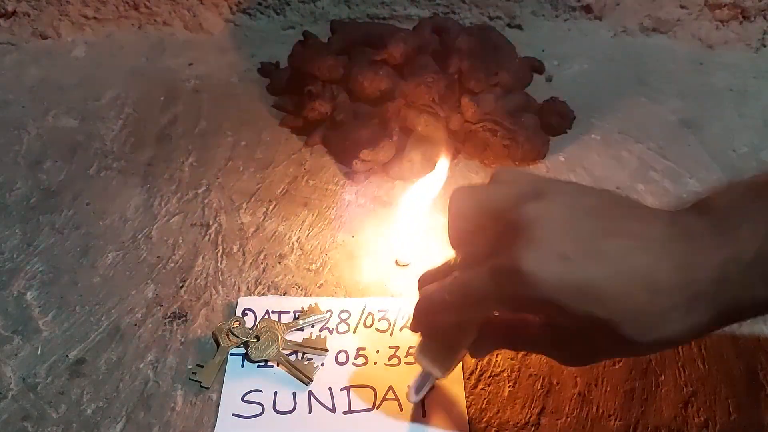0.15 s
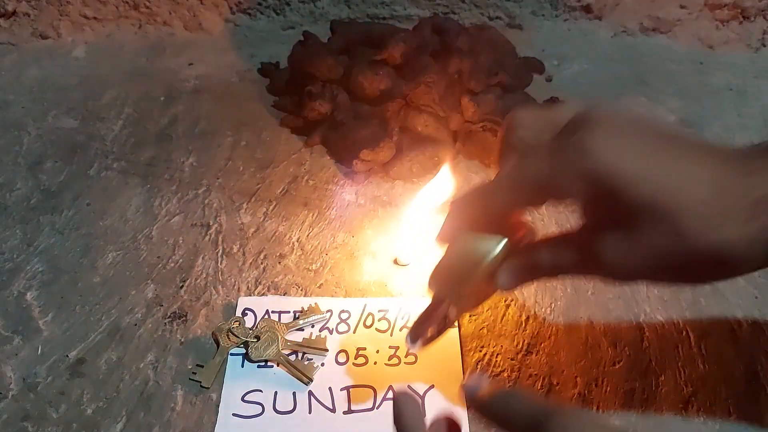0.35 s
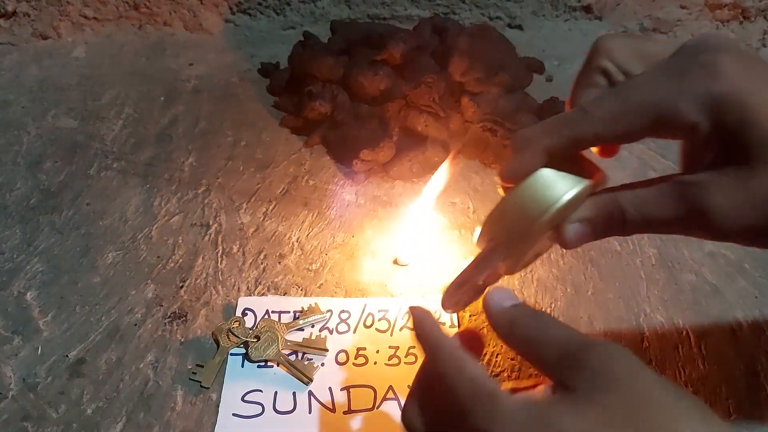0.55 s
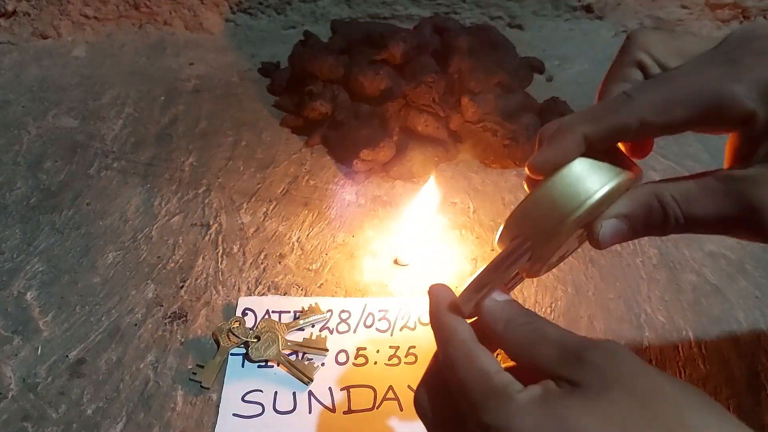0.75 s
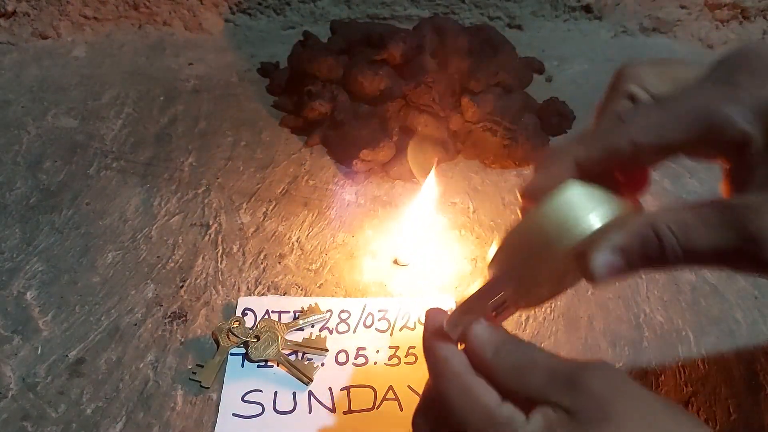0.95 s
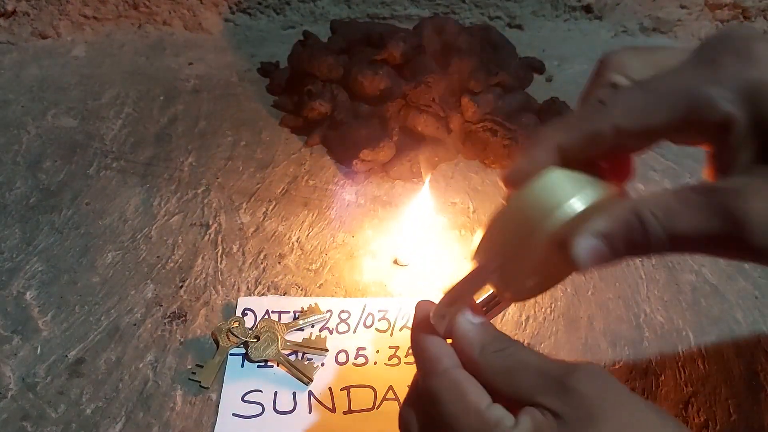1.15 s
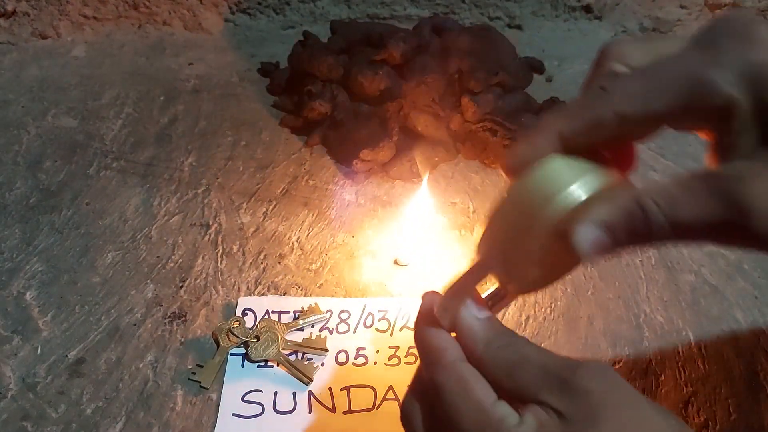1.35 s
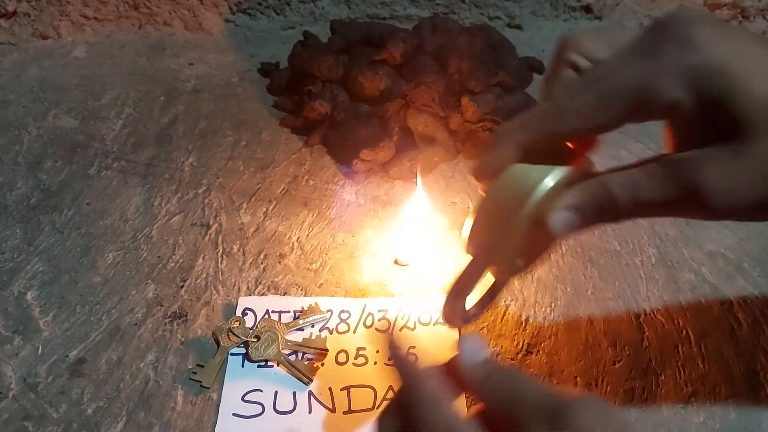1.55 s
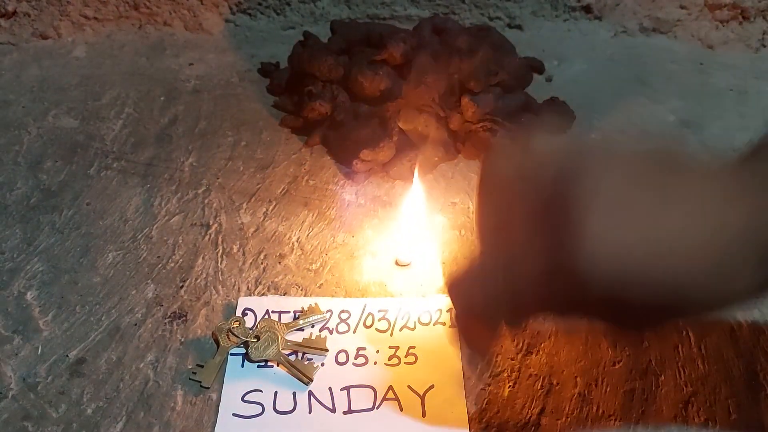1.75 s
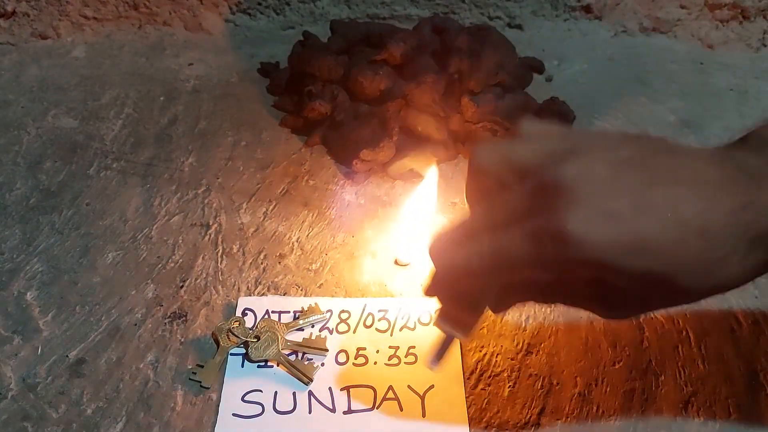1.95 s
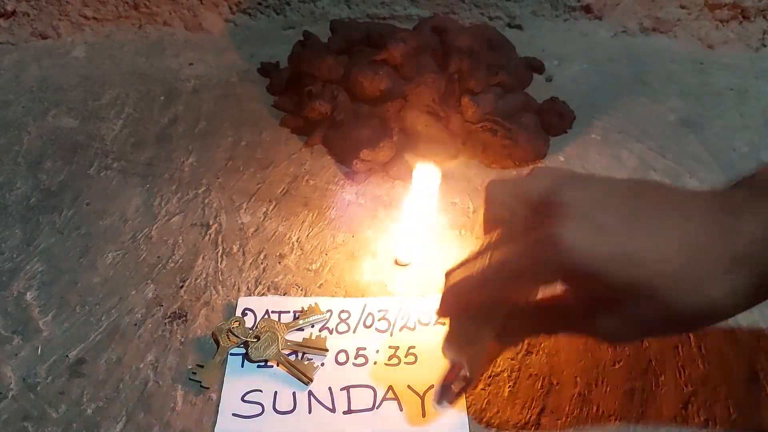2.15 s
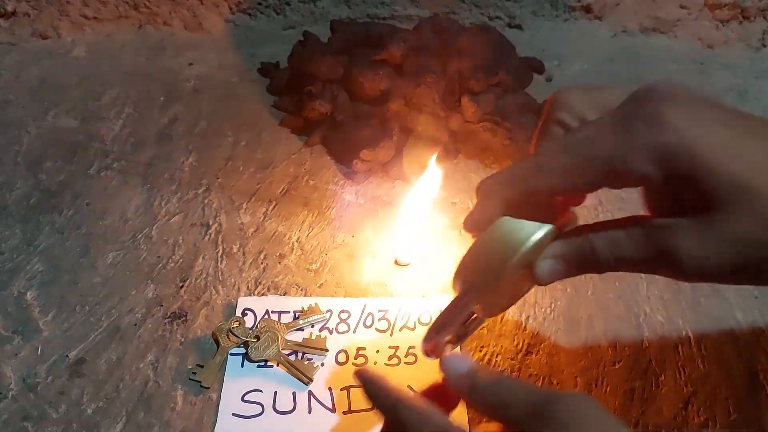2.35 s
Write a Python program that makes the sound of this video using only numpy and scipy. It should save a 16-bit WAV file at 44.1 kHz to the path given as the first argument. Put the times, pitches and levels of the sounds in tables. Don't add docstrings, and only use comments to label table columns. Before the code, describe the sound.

A hand-held metal padlock strikes a hard floor once near the start and twice near the end, with tiny key and shackle ticks between, over faint low rumble in a small hard room, close microphone.

```python
import sys
import numpy as np
from scipy import signal
from scipy.io import wavfile
from scipy.ndimage import map_coordinates

SR = 44100
rng = np.random.default_rng(int(sys.argv[2]) if len(sys.argv) > 2 else 0)


def elevation(decibels):
    levels = np.asarray(decibels, float)
    return 10 ** (levels / 20)


def unload_audio(sound):
    columns = np.transpose(np.atleast_2d(sound))
    steps = np.round(np.clip(columns, -1, 1) * 32767)
    wavfile.write(sys.argv[1], SR, steps.astype(np.int16))


N = 105840

# f/Hz, density level/dB (per Hz)
RUMBLE_SPECTRUM = [(15, -39), (25, -15), (108, 4.5), (172, -7.5), (468, -13), (818, -28), (1540, -35),
                   (1730, -48.5), (2500, -52), (3250, -71), (5500, -120)]
# t/s, level/dB
RUMBLE_SWELL = [(0.0, -55), (0.23, -60.5), (0.41, -61.5), (0.79, -63), (1.79, -58.5), (2.0, -59.5),
                (2.4, -58)]
# f/Hz, likeness/1
PORT_LIKENESS = [(22, 0), (60, .9), (180, .9), (550, 0.8), (1650, 0), (5000, 0)]
# f/Hz, density level/dB (per Hz)
HISS_SPECTRUM = [(1500, -2), (4000, -10.5), (8500, -9.5), (11000, -2), (14500, -2.06), (16500, -3.0)]
# f/Hz, t60/s
ROOM_T60 = [(100, 0.33), (300, 0.1), (1000, 0.11), (4000, 0.14), (8000, 0.1), (14000, 0.091)]
# f/Hz, share/1
ROOM_OWN_SHARE = [(60, 0.21), (150, 0.46), (500, 0.94), (2000, 1), (8000, .9)]
# f/Hz, width/Hz, level/dB
RUB_RESONANCES = [(4100, 300, 0.5), (5300, 1300, -6.5), (8000, 220, -8.5), (1427, 2800, -2.5)]
# t/s, level/dB, f/Hz
LOOSE_RINGS = [(1.572, -55, 955), (1.648, -39.5, 13600), (1.652, -47, 13600), (1.785, -50, 1640),
               (2.008, -43, 13600), (2.055, -53.5, 13500), (2.07, -54, 13400), (2.072, -56, 4700),
               (2.27, -71, 13600), (2.386, -74, 8800)]
# t/s, peak level/dB, low ring
# level/dB, f/Hz, low f/Hz
TICKS = [(0.0002, -50.5, -14, 8200, 1577), (0.006, -50, -12, 12000, 1900),
         (0.0303, -54.5, -20, 3840, 1055), (0.0843, -41.5, -71, 7900, 840),
         (0.094, -42.5, -32, 7990, 1000), (0.133, -58.5, -34, 6000, 990),
         (0.1536, -43.5, -26, 13800, 900), (0.164, -38, -21.5, 6600, 980),
         (0.222, -20, -13.5, 6100, 1900), (0.238, -26.5, -24, 7500, 1610),
         (0.2908, -44, -8, 4650, 900), (0.337, -44.5, -20, 6230, 870),
         (0.4044, -64.5, -20.5, 6400, 1680), (0.575, -65, -19.5, 12950, 1713),
         (0.8806, -65, -41, 12440, 1083), (1, -41, -23, 4100, 1400), (1.0033, -35, -22, 4160, 1400),
         (1.092, -43.5, -19, 14500, 1090), (1.2148, -32.5, -25, 3820, 2066),
         (1.2894, -48.5, -16.5, 14560, 984), (1.2961, -38.5, -16, 8800, 2024),
         (1.419, -35.5, -19.5, 9040, 2103),
         (1.5549, -43, -21.5, 4130, 974), (1.6158, -52.5, -22.5, 4300, 1098),
              (1.6485, -34.5, -36.5, 12840, 870), (1.6516, -37, -28.5, 13960, 2000),
              (1.772, -40.5, -15.5, 4460, 1770), (1.778, -40, -16, 12500, 1620),
              (1.9424, -37, -24, 11920, 990), (1.9814, -58, -14, 5940, 970),
              (2.0054, -42.5, -45, 13500, 972), (2.0491, -40, -22, 13530, 1790),
              (2.0692, -41.5, -15.5, 13460, 1720), (2.2186, -40, -19.5, 14280, 883),
              (2.268, -65, -31.5, 13300, 944), (2.2836, -40.5, -57.5, 12870, 1710),
         (1.1002, -36.5, -20, 14400, 1028), (1.113, -45.5, -15, 8000, 1357),
               (1.5711, -51.5, -4, 3630, 976), (1.575, -44, -15.5, 6000, 948),
               (1.787, -33, -13.5, 8400, 1575), (1.793, -47.5, -4.5, 4500, 1584),
               (1.818, -34.5, -36, 6250, 1600), (1.851, -24, -11.5, 13500, 1570),
               (1.856, -23.5, -17.5, 6000, 1810), (1.865, -22.5, -14, 9000, 1700),
               (1.874, -26.5, -8.5, 4500, 1036), (1.861, -22, -20.5, 12500, 1420),
               (1.883, -22.5, -23.5, 10300, 1410), (2.061, -42.5, -17.5, 11400, 1700),
               (2.078, -44.5, -17.5, 4600, 1700), (2.1037, -48.5, -31, 6470, 1700),
               (2.13, -20, -12, 5710, 1070), (2.139, -29, -25.5, 7700, 1700),
               (2.157, -27.5, -24, 13450, 1090), (2.168, -31.5, -27.5, 13000, 1060),
               (2.392, -75, -37, 9220, 1075)]
# f/Hz, level/dB
LOCK_MODES = [(3000, -4.5), (3680, -4.5), (4220, -0.5), (5100, -1), (5850, 2), (6800, 0.5), (7750, -0.5),
              (8700, 0.5), (10100, -13), (11500, -0.5), (12500, -20), (13400, -2.5), (14500, -5),
              (15500, -11.5)]
# f/Hz, level/dB, t60/s
SHACKLE_MODES = [(900, -6, 0.016), (1470, -9.5, 0.0082), (1700, -2, 0.0066), (2024, -5.5, 0.0065),
                 (2339, -4, 0.02)]
# t/s, peak level/dB, thud level/dB, chatter length/s, brightest ring f/Hz
KNOCKS = [
    (0.2092, -4, 1.5, 0.0045, 12400),
    (1.8406, -7, 1.53, 0.0069, 13860),
    (2.12, -4.5, 1.7, 0.006, 7660),
]
# f/Hz, level/dB, t60/s
FLOOR_SPOTS = [
    [(122, -5.5, 0.043), (250, -11.5, .04), (385, -7, 0.024), (494, 1.5, .03), (820, 5, 0.012),
     (1190, -3, 0.0075), (1200, -3, 0.0067), (1700, 3, 0.0086), (1930, 1.5, 0.0059), (2380, -14, .015)],
    [(110, -9.5, 0.18), (194, -4.5, 0.1), (319, -13.5, 0.029), (540, 12.5, 0.015), (870, -3, 0.06),
     (1166, -1, 0.05), (1400, -4, 0.02), (1700, 9, 0.0089), (1876, 2.5, 0.016), (2160, -21, 0.005)],
    [(122, -5, .13), (264, -27, 0.054), (383, 8, 0.032), (490, -11.5, 0.022), (725, 7, 0.02),
     (984, 7.5, 0.0079), (1570, 5, 0.011), (1700, 0.5, 0.0092), (1886, 2.5, 0.018), (2374, -22, .015)],
]

REBOUND_S, REBOUND_DB = [.0027, .0027, 0.0034], [-2, -10, -5.5]
SHACKLE_HUM_HZ, SHACKLE_HUM_DB, SHACKLE_HUM_T60_S = 1680, [-82.5, -95, -81.5], 5.8
HUM_HELD_S, HUM_DAMP_S = 0.39, 0.071

WANDER_DB, WANDER_PER_S = 3, 8
HISS_DB = -81.5
ROOM_DB, ROOM_ONSET_S, LATE_DB, LATE_T60_S = -8, 0.003, -31.5, 0.28
RUB_S, RUB_LENGTH_S, RUB_DB = .635, .09, -78
KEY_T60_S, LOCK_T60_S, OWN_T60_S, LOW_OWN_T60_S = .04, .0035, .006, .018
CHATTER_PER_S, CHATTER_SPREAD_DB = 6000, 1
TICK_CHATTER_S, TICK_FALL_DB, TICK_DB, TICK_CRACK_DB = .004, 9, 6, 5
KNOCK_FALL_DB, KNOCK_DB, KNOCK_CRACK_DB, SECOND_DB = 4, 2, 5, -3.5
PITCH_WIDTH_OCT, PITCH_LIFT_DB = 0.33, 6.5
GRIP_DETUNE, GRIP_SPREAD_DB = .05, 1.3
LOCK_LOW_EDGE_HZ, LOW_DB = 2100, -4
THUD_DELAY_S, THUD_TO_ROOM_S, THUD_SPREAD_DB = .0002, .004, 1.5
BASS_CUT_HZ, ROOM_BASS_CUT_HZ = 85, 160
ECHO_S, ECHO_DB = .0012, -14.5
SHADOW_HZ, LEAK_HZ, LEAK_DB, LEAK_DIRECT_DB = 3550, 10515, -19, -2
RIGHT_LAG = 3
OVERLOAD, TOP_HZ = .8, 16000


def at_hz(points, hz):
    table_hz, values = np.transpose(points)
    return np.interp(np.log(hz), np.log(table_hz), values)


def rms_one(x):
    return x / np.sqrt(np.mean(x ** 2) + 1e-20)


def cut(x, hz, kind, order=2):
    return signal.sosfilt(signal.butter(order, hz, kind, fs=SR, output="sos"), x)


def add(out, x, s):
    i = int(s * SR)
    out[:, i:i + x.shape[-1]] += x[..., :N - i]


def bands(size):
    edges = 22 * 2 ** np.arange(0, 9.9, .5)
    white = rng.standard_normal((2, 2, size))
    return [(np.sqrt(a * b), cut(white[k % 2], [a, b], "band"))
            for k, (a, b) in enumerate(zip(edges, edges[1:]))]


def wander(size):
    knots = rng.standard_normal(64)
    return map_coordinates(knots, [np.arange(size) / SR * WANDER_PER_S], order=3)


def rumble():
    settle = 8000
    out = 0
    for hz, (mid, side) in bands(N + settle):
        alike = np.clip(at_hz(PORT_LIKENESS, hz), 0, 1)
        treble_loss_db = 12 * max(np.log2(hz / 2500), 0)
        level_db = at_hz(RUMBLE_SPECTRUM, hz) + WANDER_DB * wander(N + settle) - treble_loss_db
        opposed = side * np.array([[1], [-1]])
        out = out + elevation(level_db) * (np.sqrt(1 + alike) * mid + np.sqrt(1 - alike) * opposed)
    s, db = np.transpose(RUMBLE_SWELL)
    return rms_one(out[:, settle:]) * elevation(np.interp(np.arange(N) / SR, s, db) - 0.5)


def hiss():
    out = sum(elevation(at_hz(HISS_SPECTRUM, hz)) * noise for hz, noise in bands(N) if hz > 1000)
    return rms_one(out) * elevation(HISS_DB)


def room(x):
    t, tail = np.arange(SR // 2) / SR, 0
    for hz, (shared, own) in bands(len(t)):
        share = np.clip(at_hz(ROOM_OWN_SHARE, hz), 0, .99)
        dying = elevation(-60 * t / at_hz(ROOM_T60, hz)) + elevation(LATE_DB - 60 * t / LATE_T60_S)
        left = shared * np.sqrt(1 - share ** 2) + share * own
        tail = tail + dying * np.array([left, shared])
    tail = tail * (1 - np.exp(-(t / ROOM_ONSET_S) ** 2))
    tail = tail / np.sqrt(np.sum(tail[1] ** 2))
    return elevation(ROOM_DB) * signal.fftconvolve(x[None], tail, axes=1)[:, :N]


def rub():
    t = np.arange(N) / SR - RUB_S
    grains = rng.standard_normal(N) * rng.exponential(1, N)
    tone = sum(elevation(db) * rms_one(cut(grains, [hz - width / 2, hz + width / 2], "band", order=1))
               for hz, width, db in RUB_RESONANCES)
    fade_in = np.clip(t / 0.0057, 0, 1)
    fade_out = np.clip((RUB_LENGTH_S - t) / 0.02, 0, 1)
    return elevation(RUB_DB) * tone * fade_in * fade_out


def rings(modes, lift_db, size=4096, sign=-1):
    hz, db, t60 = np.transpose(modes)[:, :, None]
    t = np.arange(size) / SR
    signs = sign ** np.arange(len(hz))[:, None]
    decay = elevation(db + lift_db[:, None] - 60 * t / t60)
    return np.sum(decay * np.sin(2 * np.pi * hz * t) * signs, axis=0)


def key():
    out = np.zeros((2, N))
    for s, db, hz in LOOSE_RINGS:
        add(out, rings([(hz, db, KEY_T60_S)], np.zeros(1)) * np.ones((2, 1)), s)
    return out


def chatter(length_s, fall_db):
    t = np.arange(800) / SR
    chance, size, side = rng.random((3, 800))
    clicks = (chance < CHATTER_PER_S / SR) * np.sign(side - .5)
    clicks = clicks * elevation(-CHATTER_SPREAD_DB * np.log(size + 1e-3) - 5.5)
    clicks[0] = -1
    clicks = clicks * elevation(-fall_db * t / length_s) / (1 + (t / length_s) ** 8)
    return np.array([clicks, np.sqrt(np.sum(clicks ** 2)) * (t == 0)])


def clink(contact, db, low_db, hz, low_hz, crack_db=TICK_CRACK_DB):
    modes = np.array([(*mode, LOCK_T60_S) for mode in LOCK_MODES] + [(hz, -9, OWN_T60_S)])
    detune = np.append(rng.uniform(-2.3, 1, len(LOCK_MODES)), 0)
    modes[:, 0] *= 1 + GRIP_DETUNE * detune
    distance = np.log2(modes[:, 0] / hz) / PITCH_WIDTH_OCT
    lift_db = PITCH_LIFT_DB * np.exp(-distance ** 2) + GRIP_SPREAD_DB * rng.standard_normal(len(modes))
    body = rings(modes, lift_db)
    body = body / np.abs(body).max()
    body[:64] += elevation(crack_db) * cut(np.eye(1, 64)[0], 3600, "high")
    high = cut(signal.fftconvolve(contact, body[None], axes=1), LOCK_LOW_EDGE_HZ, "high", order=4)

    low_modes = SHACKLE_MODES + [(low_hz, 6.5, LOW_OWN_T60_S)]
    shackle = rings(low_modes, GRIP_SPREAD_DB * rng.standard_normal(len(low_modes)))
    low = cut(signal.fftconvolve(contact, shackle[None], axes=1), 570, "high", order=3)
    high = high / np.abs(high[0]).max()
    low = low / np.abs(low[0]).max()
    return elevation(db) * (high + elevation(low_db + LOW_DB) * low)


def ticks():
    out = np.zeros((2, N))
    for s, db, low_db, hz, low_hz in TICKS:
        add(out, clink(chatter(TICK_CHATTER_S, TICK_FALL_DB), db + TICK_DB, low_db, hz, low_hz), s)
    return out


def floor_thud(spot):
    thud = rings(spot, THUD_SPREAD_DB * rng.standard_normal(len(spot)), size=16384, sign=1)
    thud = -cut(thud, 3000, "low", order=1)
    t = np.arange(len(thud)) / SR
    to_room = elevation(5.0) * thud * np.exp(-t / THUD_TO_ROOM_S)
    return np.array([thud, to_room]) / np.abs(thud).max()


def shackle_hum(db):
    t = np.arange(SR) / SR
    finger_db = 5.0 * np.clip(t - HUM_HELD_S, 0, None) / HUM_DAMP_S
    return elevation(db - 60 * t / SHACKLE_HUM_T60_S - finger_db) * np.sin(2 * np.pi * SHACKLE_HUM_HZ * t)


def knocks():
    out = np.zeros((2, N))
    per_knock = zip(KNOCKS, SHACKLE_HUM_DB, FLOOR_SPOTS, REBOUND_S, REBOUND_DB)
    for (s, db, thud_db, length_s, hz), hum_db, spot, later_s, later_db in per_knock:
        first_db = db + KNOCK_DB
        first = clink(chatter(length_s, KNOCK_FALL_DB), first_db, -22.5, hz, 1300, KNOCK_CRACK_DB)
        add(out, first, s)
        second = clink(chatter(length_s, KNOCK_FALL_DB), first_db + SECOND_DB, -30.5, 7700, 1700,
                       KNOCK_CRACK_DB)
        add(out, second, s + later_s)
        thud = floor_thud(spot)
        add(out, elevation(thud_db - 9.0) * thud, s + THUD_DELAY_S)
        add(out, elevation(thud_db - 13.0 + later_db) * thud, s + THUD_DELAY_S + later_s)
        add(out[:1], shackle_hum(hum_db), s)
    return out


def scene():
    direct, to_room = cut(knocks() + ticks() + key() + rub(), BASS_CUT_HZ, "high", order=4)
    wet = room(cut(to_room, ROOM_BASS_CUT_HZ, "high"))
    left = direct + wet[0] + elevation(ECHO_DB) * np.roll(direct, int(ECHO_S * SR))
    leak = cut(elevation(LEAK_DIRECT_DB) * direct + wet[0], LEAK_HZ, "high", order=3)
    left = cut(left, SHADOW_HZ, "low", order=4) + elevation(LEAK_DB) * leak
    right = np.roll(direct + wet[1], RIGHT_LAG)
    return np.array([left, right]) + rumble() + hiss()


def roll_off(x):
    return signal.sosfilt(signal.butter(12, 17130, fs=SR, output="sos"), x)


def record(dry):
    rounded = OVERLOAD * np.tanh(dry / OVERLOAD)
    return roll_off(cut(rounded, TOP_HZ, "low", order=30))


dry = scene()
out = record(dry)
unload_audio(out)
```